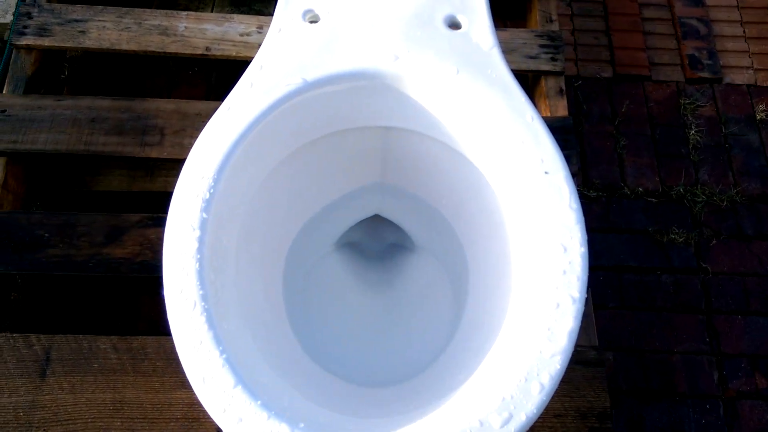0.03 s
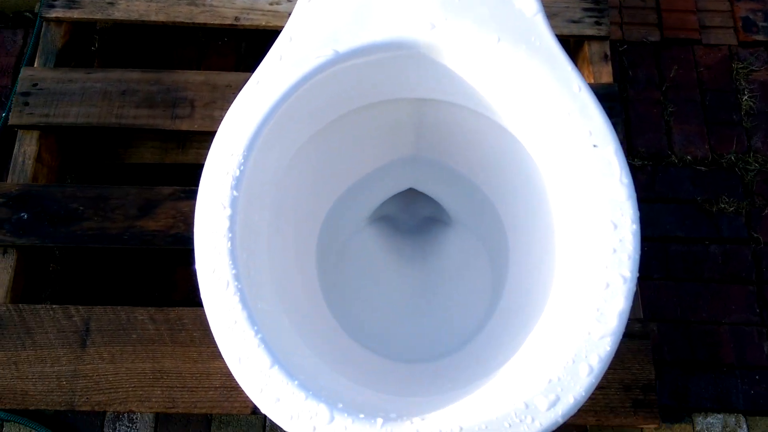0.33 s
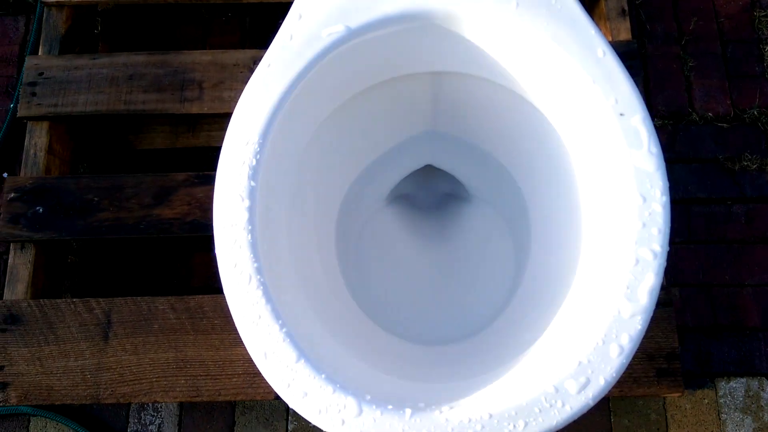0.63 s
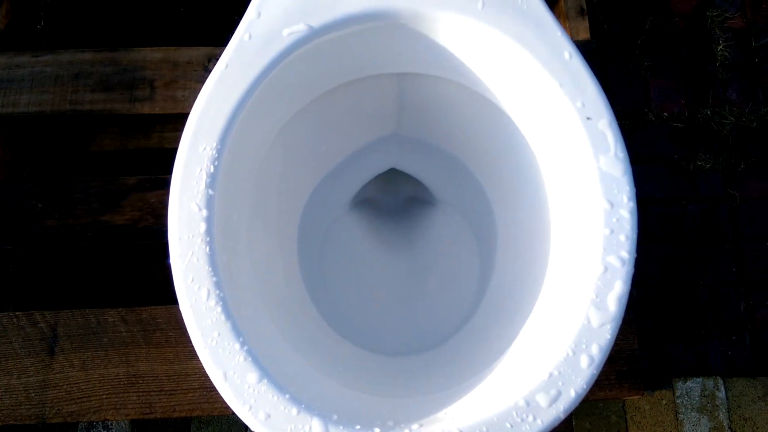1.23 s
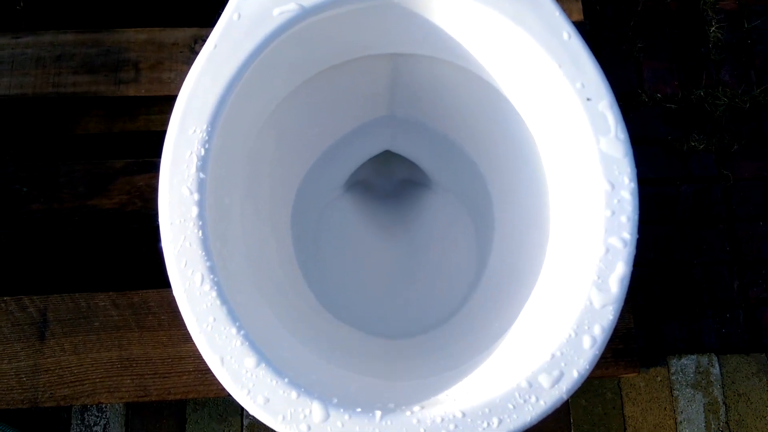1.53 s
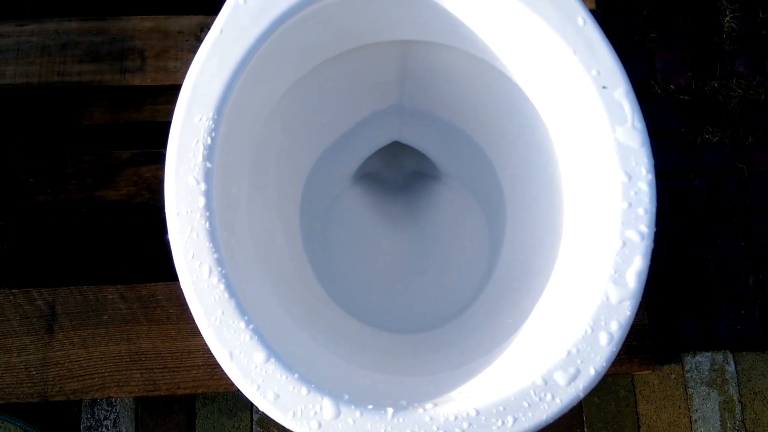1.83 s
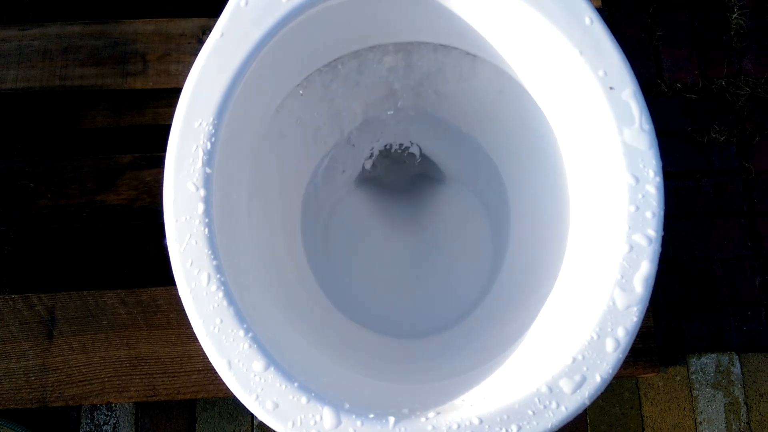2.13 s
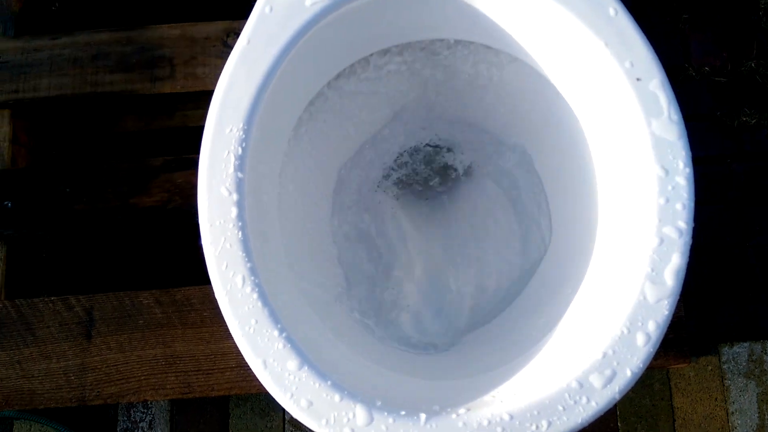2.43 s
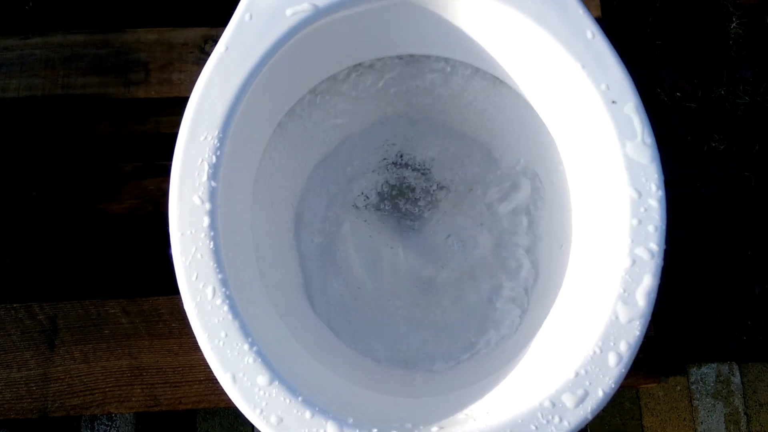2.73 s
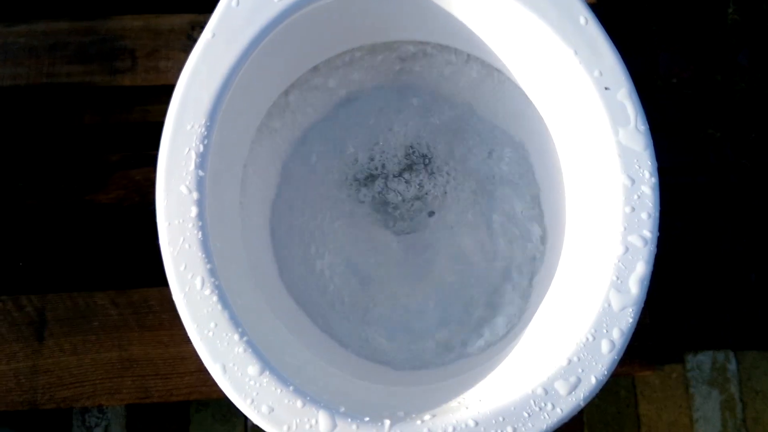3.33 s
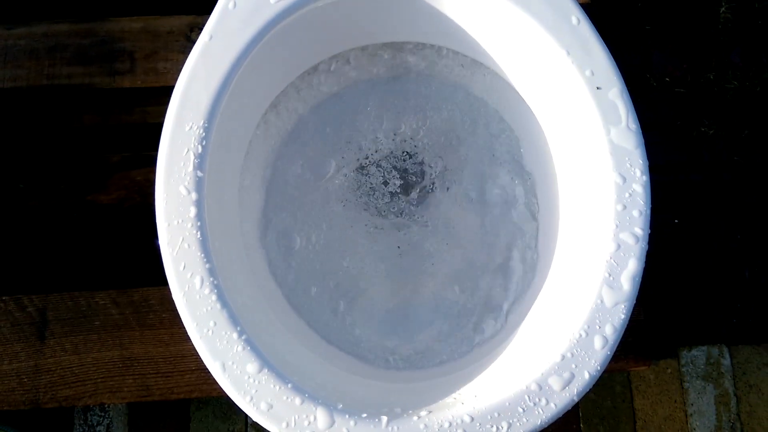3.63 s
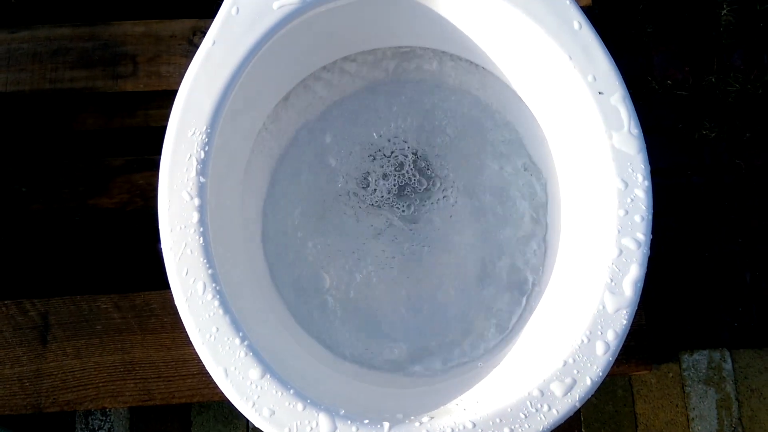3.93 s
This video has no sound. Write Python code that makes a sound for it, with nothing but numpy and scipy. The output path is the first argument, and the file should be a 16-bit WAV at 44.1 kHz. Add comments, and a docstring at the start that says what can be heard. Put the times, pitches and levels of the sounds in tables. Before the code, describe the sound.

A toilet flush, heard close, bursts in with bubbling, splashing water after a soft handle click.

```python
"""A toilet flushing outdoors, a stereo pair of microphones just above the bowl, a low rumble far off.
The handle clicks and creaks, then the inlet pipe hoots off to one side as water drives the air out.
Water bursts in under the rim, close up: a rush of bubbles and spray with single gulps and splashes,
while two hollow air resonances of the filling channel and bowl sink in pitch."""
import sys
import numpy as np
from scipy import signal
from scipy.fft import rfft, irfft
from scipy.io import wavfile

SR = 44100
rng = np.random.default_rng(int(sys.argv[2]) if len(sys.argv) > 2 else 0)


def wrap_up_sound(samples):
    """Save the sound to the file named by the first command line argument, as 16-bit audio."""
    columns = np.atleast_2d(samples).T
    # keep every value between -1 and 1, then stretch to whole-number steps
    tamed = np.clip(columns, -1, 1)
    steps = np.round(tamed * 32767).astype(np.int16)
    wavfile.write(sys.argv[1], SR, steps)


N = 176400
T = np.arange(N) / SR
GRAIN_T = np.arange(SR // 7) / SR

# distant rumble: frequency_hz, relative_density_db
RUMBLE_SPECTRUM = [(22, -21), (45, -3.5), (78, 0.5), (125, -7), (200, -22), (450, -30), (1800, -38),
                   (4000, -52), (15500, -57)]
# a faint swish and a squeak: start_s, length_s, level_db, pitch_hz, width_hz
HANDLE_RUBS = [(0.264, 0.36, -68, 12000, 6000), (.452, .028, -70, 4100, 150)]
# faint ticks: start_s, level_db, pitch_hz
HANDLE_TICKS = [(.667, -53, 10000), (1.3006, -56, 12500)]
# the mechanism sliding: start_s, length_s, level_db
HANDLE_SCRAPES = [(0.82, 0.092, -66), (1.872, 0.06, -62.5)]
# the handle knocking: start_s, ring_db, snap_db
HANDLE_KNOCKS = [(0.826, -46, -46.5), (0.9284, -61, -45)]
# modes of the handle: pitch_hz, gain_db, t60_s
HANDLE_MODES = [(2480, 2, 0.037), (2670, -4, 0.044), (4500, -5.5, 0.032), (5100, -8, 0.04)]
# strength of the flow: time_s, bass_db, middle_db, treble_db
FLOW_LEVELS = [(1.86, -88, -70, -69), (1.94, -57, -67, -58), (1.965, -51, -52, -51), (2.0, -46, -48, -49),
               (2.03, -34.5, -41, -43), (2.07, -30.5, -30.5, -44), (2.095, -41.5, -42, -49),
               (2.19, -44.5, -37, -47), (2.225, -41.5, -27.5, -43), (2.30, -34, -35, -49),
               (2.37, -40, -30.5, -44.5), (2.5, -41, -33, -42.5), (2.66, -46, -34.5, -48),
               (2.79, -38, -32, -43), (2.87, -40, -31, -41), (2.99, -37.5, -31.5, -43),
               (3.08, -40, -38, -45.5), (3.21, -36.5, -29.5, -51), (3.32, -42, -35.5, -42),
               (3.6, -39.5, -35, -45), (4.0, -41.5, -37, -44.5)]
# centres of that bass, middle and treble: frequency_hz
FLOW_BANDS = [473, 2090, 9500]
# water running down the bowl: frequency_hz, relative_density_db
RUSH_SPECTRUM = [(220, -5.5), (320, -2), (470, -1), (700, -6.5), (870, -2), (1050, -7.5), (1500, -1.5),
                 (1950, -4.5), (2300, -4.5), (4300, -10.5), (7600, -17), (9300, -15.5), (10600, -24.5),
                 (15500, -20.5)]
# water drumming on the bowl: time_s, level_db
DRUM_LEVELS = [(1.9, -95), (2.05, -46.5), (2.7, -52.5), (4.0, -51.5)]
# air driven through the inlet pipe: start_s, length_s, level_db
AIR_PUFFS = [(1.934, 0.069, -44), (2.044, 0.043, -46.5), (2.131, 0.03, -41.5)]
# modes of that pipe: pitch_hz, gain_db, release_s
PIPE_MODES = [(259, 5, 0.0077), (555, -10.5, 0.012), (1600, -15, .01)]
# strength of the first gush: time_s, level_db
GUSH_LEVELS = [(1.935, -75), (1.965, -63), (2.005, -57), (2.06, -38.5), (2.10, -55), (2.155, -45.5),
               (2.23, -76)]
# narrow pipe resonances under that gush: pitch_hz, gain_db
GARGLE_MODES = [(820, 0.5), (1000, -4.5), (1170, 0), (1450, 1.5), (1730, 1.5), (3500, -3), (3880, 2),
                (4200, -7)]
# single splashes: start_s, level_db, pitch_hz, t60_s
SPLASH_HITS = [(1.952, -26, 9500, 0.052), (1.967, -25.5, 3800, 0.05), (2.012, -28.5, 8500, 0.041),
               (2.025, -18.5, 5470, 0.032), (2.142, -18.5, 4370, 0.043), (2.21, -21.5, 7000, 0.043),
               (2.227, -17.5, 2230, 0.029), (2.3304, -15, 3840, 0.012), (2.3602, -13, 3420, 0.022),
               (2.3615, -15.5, 7500, 0.025), (2.576, -17, 5600, 0.011), (2.774, -14.5, 5670, 0.013),
               (2.9016, -15.5, 5770, 0.014), (2.9611, -13, 4450, 0.015), (2.976, -16, 3000, 0.012),
               (3.0015, -17.5, 6140, 0.017), (3.028, -15, 4500, 0.027), (3.146, -13.5, 9140, 0.0054),
               (3.2616, -5.5, 8460, 0.0052), (3.46, -19, 8150, 0.017), (3.5756, -24.5, 4500, .01),
               (3.618, -19, 4500, 0.018), (3.7277, -16, 6250, 0.0076), (3.801, -18.5, 4003, 0.029),
               (3.881, -21, 3560, .015)]
# air pockets bursting: start_s, level_db, pitch_hz
AIR_POCKETS = [(2.024, -20.5, 838), (2.046, -22.5, 299), (2.229, -29, 660), (2.2742, -18.5, 1260),
               (2.3087, -23, 1380), (2.347, -17.5, 396.7), (2.385, -28, 395), (2.4028, -30, 1600),
               (2.404, -19, 334), (2.437, -27, 1170), (2.546, -22.5, 606), (3.015, -29, 336),
               (2.789, -28, 678), (2.931, -26.5, 524), (2.975, -21.5, 1420), (3.0605, -21, 466),
               (3.094, -30, 490), (3.152, -26.5, 850), (3.174, -25, 455), (3.21, -22, 1220),
               (3.158, -27, 358), (3.339, -28, 824), (3.415, -29, 361.8), (3.459, -28, 552),
               (3.6747, -24, 873), (3.836, -28.5, 553), (3.886, -29.5, 532)]
# air in the filling channel and bowl: time_s, lower_hz, lower_db, upper_hz, upper_db
HOLLOW_GLIDES = [(2.28, 440, -86, 830, -79), (2.35, 405, -33, 770, -35.5), (2.41, 345, -34, 651.3, -40.5),
                 (2.46, 295, -37, 628.2, -38.5), (2.55, 275, -45.5, 606, -38), (2.68, 240, -49.5, 548, -43),
                 (2.95, 250, -46.5, 496.4, -46.5), (3.12, 280, -49.5, 443.2, -39),
                 (3.4, 270, -49, 360, -47), (4.0, 280, -53, 337.2, -54)]
# how alike rumble and rush are at the two microphones: frequency_hz, correlation
MIC_LIKENESS = [(150, .98), (400, 0.78), (750, 0.69), (1400, 0.13), (4000, 0.014)]
# colour of the left microphone against the right: frequency_hz, left_minus_right_db
MIC_BALANCE = [(200, 1.6), (550, 3), (1200, -0.5), (1800, 1), (2700, 5.5), (4200, 8.5), (6400, 3.5),
               (15000, -2.5)]
# how much earlier the left microphone hears: frequency_hz, lead_s
MIC_LEAD = [(500, 0.000037), (1300, 0.0002917)]

LN_1000 = np.log(1000)   # a decay of 60 dB
GULP_CYCLES, GULP_SCATTER = 24.2, 0.24   # cycles to die away; share of the full stereo scatter


def from_db(db):
    """Decibels to gain."""
    return 10 ** (np.asarray(db) / 20)


def rms_one(x):
    """Scale to rms 1."""
    return x / np.sqrt(np.mean(x ** 2) + 1e-20)


def in_time(rows, t=T):
    """The columns of a curve at times t."""
    times, *columns = np.transpose(rows)
    return [np.interp(t, times, column) for column in columns]


def at_hz(points, hz):
    """A spectrum read on a log-frequency axis."""
    frequencies, values = np.transpose(points)
    return np.interp(np.log(hz), np.log(frequencies), values)


def flow_db(levels, hz):
    """Strength of the flow at one frequency, between its bass, middle and treble."""
    shares = [np.interp(np.log(hz), np.log(FLOW_BANDS), band) for band in np.eye(len(FLOW_BANDS))]
    return sum(level * share for level, share in zip(levels, shares))


def drift(rate_hz):
    """A smooth random wander of rms 1, drawn every 40 samples."""
    r = np.exp(-80 * np.pi * rate_hz / SR)
    slow = signal.lfilter([1], [1, -2 * r, r * r], rng.standard_normal(N // 40 + 2002))[2000:]
    return np.interp(np.arange(N) / 40, np.arange(len(slow)), rms_one(slow))


def resonate(x, hz, width_hz):
    """One two-pole resonance."""
    r = np.exp(-np.pi * width_hz / SR)
    return signal.lfilter([1, 0, -1], [1, -2 * r * np.cos(2 * np.pi * hz / SR), r * r], x + 1e-18)


def ringing_noise(hz, width_hz):
    """Mono noise sent twice through one resonance; rms 1."""
    return rms_one(resonate(resonate(rng.standard_normal(N), hz, width_hz), hz, width_hz))


def noise_bands(spectrum):
    """Third-octave bands of stereo noise as (hz, band); together rms 1."""
    edges = np.geomspace(22, 17000, 30)
    centres = np.sqrt(edges[1:] * edges[:-1])
    power = from_db(at_hz(spectrum, centres)) ** 2 * np.diff(edges)
    white = rng.standard_normal((2, 2, N))
    for k, hz in enumerate(centres):
        bandpass = signal.butter(2, edges[k:k + 2], "band", fs=SR, output="sos")
        mid, side = signal.sosfilt(bandpass, white[k % 2])
        alike = at_hz(MIC_LIKENESS, hz)
        pair = np.sqrt(1 + alike) * mid + np.sqrt(1 - alike) * side * [[1], [-1]]
        yield hz, np.sqrt(power[k] / power.sum()) * rms_one(pair)


def place(out, start_s, sound, scatter=1, pan_spread_db=4.5, lead_spread_s=.00004):
    """Mix a short sound in from a random spot below the microphones."""
    pan_db, lead_s = scatter * rng.normal(0, [pan_spread_db, lead_spread_s])
    for channel, side in enumerate((.5, -.5)):
        i = min(N, int((start_s - side * lead_s) * SR))
        out[channel, i:i + len(sound)] += from_db(side * pan_db) * sound[:N - i]


def stroke(start_s, length_s):
    """A smooth swell and fade."""
    return np.sin(np.pi * np.clip((T - start_s) / length_s, 0, 1)) ** 2


def burst(hz, relative_width, t60_s, swell_share=0.028, grain_spread_db=5, crest=8.56):
    """A dying cluster of tiny impacts in one resonance; peak near 1."""
    t = GRAIN_T[:int(t60_s * SR)]
    impacts, sizes = rng.standard_normal((2, len(GRAIN_T)))[:, :len(t)]
    envelope = np.minimum(t / (swell_share * t60_s), 1) * np.exp(-LN_1000 * t / t60_s)
    cluster = impacts * from_db(grain_spread_db * sizes) * envelope
    return rms_one(resonate(cluster, hz, relative_width * hz)) / crest


def bubble(hz, decay_cycles, swell_cycles=1, rise=0.087):
    """A ringing bubble: a sine that swells, then dies by 60 dB, rising in pitch."""
    swell_s, t60_s = swell_cycles / hz, decay_cycles / hz
    t = GRAIN_T[:int((swell_s + t60_s) * SR)]
    envelope = np.minimum(t / swell_s, 1) * np.exp(-LN_1000 * np.maximum(t - swell_s, 0) / t60_s)
    return envelope * np.sin(2 * np.pi * hz * (t + rise * t * t / (2 * t60_s)))


def random_grains(per_s, low_hz, high_hz, spread_db):
    """Rows (start_s, hz, gain) of grains that come at random, their level following the flow."""
    wait, pitch, size = rng.random((3, 3000))
    start_s = FLOW_LEVELS[0][0] - np.cumsum(np.log(1 - wait)) / per_s
    hz = low_hz * (high_hz / low_hz) ** pitch
    db = flow_db(in_time(FLOW_LEVELS, start_s), hz) + spread_db * np.minimum(-np.log(size), 3)
    return np.transpose([start_s, hz, from_db(db)])[start_s < N / SR]


def rumble(level_db=-46.5):
    """Steady low noise from far off in the open air."""
    return from_db(level_db) * sum(band for _, band in noise_bands(RUMBLE_SPECTRUM))


def handle():
    """The handle knocks and ticks; its sliding mechanism rubs softly and sounds the same modes."""
    out = np.zeros((2, N))
    for start_s, ring_db, snap_db in HANDLE_KNOCKS:
        ring = sum(from_db(db) * np.exp(-LN_1000 * GRAIN_T / t60_s) * np.sin(2 * np.pi * hz * GRAIN_T)
                   for hz, db, t60_s in HANDLE_MODES)
        place(out, start_s, from_db(ring_db) * ring)
        place(out, start_s, from_db(snap_db) * burst(hz=4000, relative_width=0.85, t60_s=0.035))
    for start_s, db, hz in HANDLE_TICKS:
        place(out, start_s, from_db(db) * burst(hz, relative_width=.3, t60_s=.015))
    scrape = rms_one(sum(from_db(db) * resonate(rng.standard_normal((2, N)), hz, 2 / t60_s)
                         for hz, db, t60_s in HANDLE_MODES))
    for start_s, length_s, db in HANDLE_SCRAPES:
        out += from_db(db) * stroke(start_s, length_s) * scrape
    for start_s, length_s, db, hz, width_hz in HANDLE_RUBS:
        rub = rms_one(resonate(rng.standard_normal((2, N)), hz, width_hz))
        out += from_db(db) * stroke(start_s, length_s) * rub
    return out


def creak(start_s=.93, length_s=0.083, slips_per_s=130, level_db=-59):
    """One short, fine creak of the handle: regular slips pulse a high hiss."""
    slips = (T > start_s) * (T < start_s + length_s) * (1 - .5 * (T * slips_per_s % 1))
    hiss = rms_one(resonate(rng.standard_normal((2, N)), hz=7660, width_hz=5300))
    return from_db(level_db) * slips * hiss


def rush(level_db=-38.5, low_cut_hz=214, surge_db=1, flicker_db=3):
    """The sheet of water running down the bowl, surging as a whole and flickering in every band."""
    levels = in_time(FLOW_LEVELS)
    last_second = in_time(FLOW_LEVELS, T[N * 3 // 4:])
    surge = surge_db * drift(rate_hz=20)
    out = 0
    for hz, band in noise_bands(RUSH_SPECTRUM):
        relative_db = flow_db(levels, hz) - flow_db(last_second, hz).mean()
        out += band * from_db(relative_db + surge + flicker_db * drift(rate_hz=43))
    low_cut = signal.butter(4, low_cut_hz, "high", fs=SR, output="sos")
    return from_db(level_db) * signal.sosfilt(low_cut, out)


def hoots(attack_s=0.003, waver=0.0139):
    """Puffs of air sound the modes of the inlet pipe; the upper ones ring a little longer."""
    out = 0
    for hz, mode_db, release_s in PIPE_MODES:
        blow = 0
        for start_s, length_s, db in AIR_PUFFS:
            attack = np.clip((T - start_s) / attack_s, 0, 1)
            release = np.exp(-np.maximum(T - start_s - length_s, 0) / release_s)
            blow += from_db(db) * attack * release
        pitch_hz = hz * (1 + waver * drift(rate_hz=39.5))
        out += from_db(mode_db) * blow * rms_one(np.sin(2 * np.pi * np.cumsum(pitch_hz) / SR))
    return out


def gargle(q=58):
    """The first gush rings in the still empty pipe."""
    gush = from_db(in_time(GUSH_LEVELS)[0]) * (T > GUSH_LEVELS[0][0]) * (T < GUSH_LEVELS[-1][0])
    return gush * sum(from_db(db) * ringing_noise(hz, 2 * hz / q) for hz, db in GARGLE_MODES)


def inlet(left_lag_s=0.00013):
    """The pipe enters at one side, which delays its hoots and gargle at the left microphone."""
    pipe = hoots() + gargle()
    return np.array([np.interp(T - left_lag_s, T, pipe), pipe])


def spray(splash_gain_db=-3, drop_gain_db=3.5):
    """Sharp splashes among a patter of drops."""
    out = np.zeros((2, N))
    for start_s, db, hz, t60_s in SPLASH_HITS:
        place(out, start_s, from_db(db + splash_gain_db) * burst(hz, relative_width=0.44, t60_s=t60_s))
    for start_s, hz, gain in random_grains(per_s=260, low_hz=3140, high_hz=13200, spread_db=5):
        place(out, start_s, from_db(drop_gain_db) * gain * burst(hz, relative_width=0.52, t60_s=0.0068))
    return out


def bubbles(churn_gain_db=-4, swarm_gain_db=-2):
    """A low churn of quickly damped bubbles under a swarm of small ones."""
    out = np.zeros((2, N))
    for start_s, hz, gain in random_grains(per_s=120, low_hz=379, high_hz=1100, spread_db=4):
        place(out, start_s, from_db(churn_gain_db) * gain * bubble(hz, GULP_CYCLES / 2), GULP_SCATTER)
    for start_s, hz, gain in random_grains(per_s=260, low_hz=931, high_hz=5630, spread_db=4):
        place(out, start_s, from_db(swarm_gain_db) * gain * bubble(hz, decay_cycles=25))
    return out


def porcelain(direct, t60_s=0.029, echo_db=-3, low_cut_hz=1200):
    """The direct sound plus quick reflections off the bowl, different at each microphone."""
    echoes = rng.standard_normal((2, len(GRAIN_T))) * np.exp(-LN_1000 * GRAIN_T / t60_s)
    low_cut = signal.butter(2, low_cut_hz, "high", fs=SR, output="sos")
    echoes = signal.sosfilt(low_cut, echoes / np.linalg.norm(echoes[0]))
    return direct + from_db(echo_db) * signal.fftconvolve(direct, echoes, axes=1)[:, :N]


def cavity(bubbling, hz=880, flow_gain_db=-11, struck_gain_db=-1.5, struck_width_hz=50):
    """The air in the bowl rings at one pitch, along with the flow and after each gulp or bubble."""
    sustained = from_db(flow_db(in_time(FLOW_LEVELS), hz)) * ringing_noise(hz, width_hz=130)
    struck = np.pi * struck_width_hz / SR * resonate(bubbling, hz, struck_width_hz)
    return from_db(flow_gain_db) * sustained + from_db(struck_gain_db) * struck


def drumming():
    """The arriving water drums low on the bowl."""
    return from_db(in_time(DRUM_LEVELS)[0]) * ringing_noise(hz=103.6, width_hz=65)


def gulps(pop_gain_db=-6.5, shed_gain_db=-12, shed_within_s=.02, shed_octaves=0.817):
    """Each air pocket rings, pops as its skin tears and sheds three smaller, higher bubbles."""
    out = np.zeros((2, N))
    for start_s, db, hz in AIR_POCKETS:
        ring = bubble(hz, GULP_CYCLES, swell_cycles=2.5, rise=0.047)
        place(out, start_s, from_db(db) * ring, GULP_SCATTER)
        pop = burst(hz=1130, relative_width=0.64, t60_s=0.027)
        place(out, start_s + 1 / hz, from_db(db + pop_gain_db) * pop)
        delays_s = rng.uniform(0, shed_within_s, size=3)
        pitches_hz = hz * 2 ** np.abs(rng.normal(0, shed_octaves, size=3))
        for delay_s, shed_hz in zip(delays_s, pitches_hz):
            shed = from_db(db + shed_gain_db) * bubble(shed_hz, GULP_CYCLES)
            place(out, start_s + delay_s, shed, GULP_SCATTER)
    return out


def hollows(flutter_hz=43):
    """Two narrow air resonances of the filling channel and bowl, sinking in pitch."""
    lower_hz, lower_db, upper_hz, upper_db = in_time(HOLLOW_GLIDES)
    out = 0
    for hz, db in ((lower_hz, lower_db), (upper_hz, upper_db)):
        phase = 2 * np.pi * np.cumsum(hz) / SR
        narrow_noise = drift(flutter_hz) * np.cos(phase) + drift(flutter_hz) * np.sin(phase)
        out += from_db(db) * rms_one(narrow_noise)
    return (T > HOLLOW_GLIDES[0][0]) * out


def scene():
    """Rumble in the distance; handle and flush close below the microphones."""
    distance = rumble()
    water = rush() + inlet() + drumming() + hollows()
    bubbling = gulps() + bubbles()
    return distance + water + cavity(bubbling) + porcelain(bubbling + spray()) + handle() + creak()


def record(dry, cutoff_hz=16000):
    """The two microphones differ in colour and the left hears first; the top is cut."""
    hz = np.maximum(np.arange(N + 1) * SR / (2 * N), 1)
    side = np.array([[.5], [-.5]])
    colour = from_db(side * at_hz(MIC_BALANCE, hz))
    lead = np.exp(2j * np.pi * hz * side * at_hz(MIC_LEAD, hz))
    heard = irfft(rfft(dry, 2 * N) * colour * lead)[:, :N]
    return signal.sosfilt(signal.ellip(12, .2, 80, cutoff_hz, fs=SR, output="sos"), heard)


dry = scene()
out = record(dry)
wrap_up_sound(out)
```